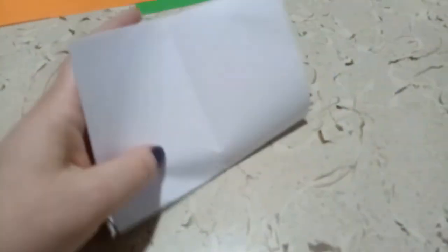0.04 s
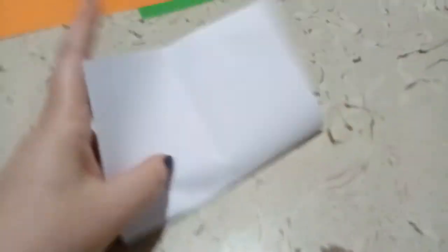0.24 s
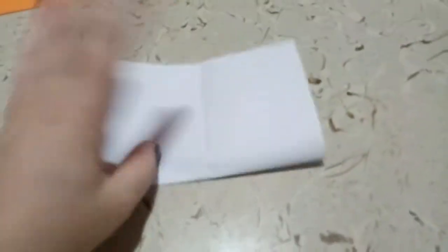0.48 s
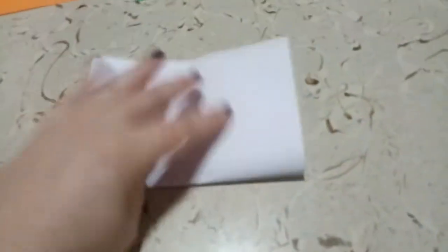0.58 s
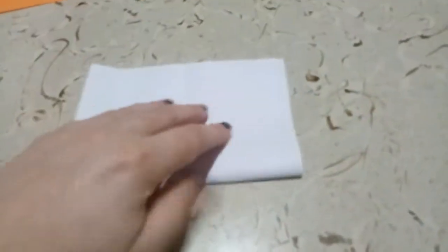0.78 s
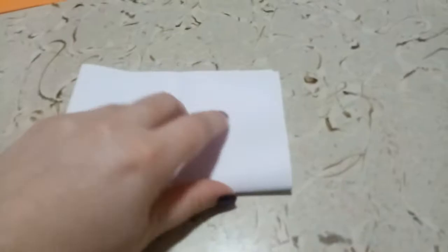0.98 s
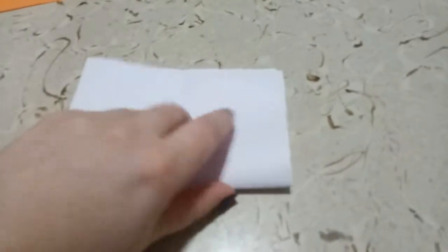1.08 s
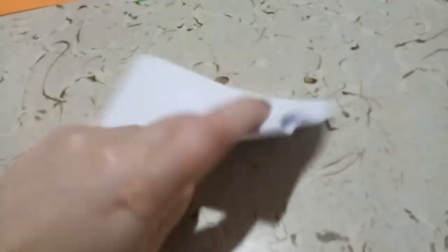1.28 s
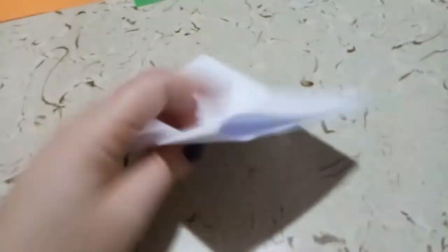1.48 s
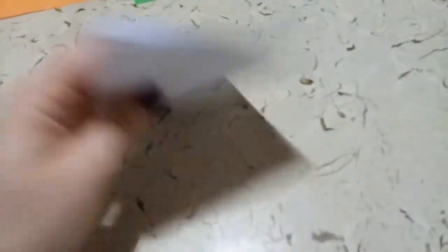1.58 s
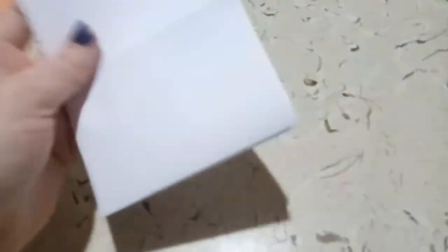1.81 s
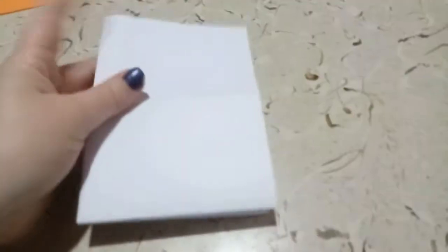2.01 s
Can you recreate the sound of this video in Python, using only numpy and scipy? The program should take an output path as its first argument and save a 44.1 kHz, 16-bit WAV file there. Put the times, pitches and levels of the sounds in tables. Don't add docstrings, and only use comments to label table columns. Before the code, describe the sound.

Layered paper folded by hand on a table: dry snaps and crinkles, one sharp early crack, a second strong crease, then softer handling and sliding rustles, close to a small microphone in a quiet, faintly humming room.

```python
import sys
import numpy as np
from scipy import signal
from scipy.fft import rfft, irfft
from scipy.io import wavfile
from scipy.ndimage import uniform_filter1d

SR = 44100
rng = np.random.default_rng(int(sys.argv[2]) if len(sys.argv) > 2 else 0)


def waveform_to_disk(signal):
    frames = np.transpose(np.atleast_2d(signal))
    scaled = np.clip(frames, -1, 1) * 32767
    samples = np.round(scaled).astype(np.int16)
    wavfile.write(sys.argv[1], SR, samples)


def voltage_ratio(level):
    return 10 ** (np.asarray(level, float) / 20)


N = 90404

# start in seconds, peak in dB, panel pitch in Hz, bright tick in dB re peak.
SNAPS = [(.0518, -30, 1300, -14), (.2195, -33, 1800, -8), (.2315, -29, 700, -8), (.2356, -22, 5000, 12),
         (.2533, -24, 900, 7), (.2613, -27, 1100, -14), (.2685, -31, 850, -14), (.336, -32, 1300, -14),
         (.3735, -27, 1500, -10), (.3825, -26, 1800, -9), (.389, -27, 1400, -10), (.4087, -19, 1500, 0),
         (.4133, -19, 1700, -14), (.424, -27, 1400, -12), (.506, -29, 2300, -10), (.5365, -34, 2600, -9),
         (.6735, -38, 2000, -6), (.698, -40, 1800, 2), (.7725, -36, 800, -6), (1.0445, -35, 2700, -5),
         (1.2368, -24, 3100, -18), (1.2557, -21, 2100, -30), (1.4197, -30, 1400, -12),
         (1.5795, -28, 2600, -7), (1.586, -33, 1200, -8), (1.708, -32, 1400, -8), (1.7217, -33, 1200, -12),
         (1.76, -32, 1100, -2), (1.7762, -26, 800, -12), (1.889, -40, 900, -8), (.2332, -33, 1700, 0),
         (.2443, -35, 3000, -8), (.2533, -21, 3600, -6), (.2588, -34, 1300, -12), (.4025, -28, 2400, -8),
         (.4075, -24, 1500, -12), (.515, -37, 2200, -8), (.586, -39, 2800, -4), (.713, -39, 2000, -8),
         (.7605, -41, 2000, 0), (.7685, -37, 1800, -6), (1.238, -27, 1600, -18), (1.2415, -30, 2300, -14),
         (1.4365, -33, 1300, -10), (1.4445, -34, 1300, -10), (1.7112, -37, 2600, -10),
         (1.718, -39, 3200, 0), (1.7382, -38, 3300, -6), (1.7785, -29, 3600, -10), (1.781, -30, 1200, -12)]
# start in
# seconds, length in seconds, level in dB, centre in Hz, loudest point as a share of the length (0-1).
CRINKLES = [(0.058, 0.1, -47, 2060, 0.27), (0.084, 0.055, -51, 5050, 1),
            (0.2278, 0.0057, -35.5, 5040, 0.63), (0.297, 0.068, -45, 6030, 0.52),
            (0.381, 0.043, -30, 1690, 0.8), (0.426, 0.047, -41.5, 2240, 0),
            (0.457, 0.013, -40.5, 6800, 0.78), (0.503, 0.048, -49.5, 2300, 0),
            (0.5855, 0.044, -47, 3200, 0.36), (.768, 0.013, -37, 1400, 0.34),
            (1.008, 0.019, -42.5, 3070, 0.72), (1.039, 0.018, -42.5, 2630, 0.46),
            (1.2275, .014, -34.5, 3420, 0.34), (1.234, 0.022, -35.5, 2300, 0.22),
            (1.259, 0.021, -41, 2450, 0.18), (1.312, 0.04, -40.5, 4700, 0.61),
            (1.416, 0.035, -42, 1400, 0.4), (1.485, 0.048, -42, 2950, 0.42),
            (1.565, 0.025, -42, 2020, 0.08), (1.71, 0.0079, -41.5, 2260, 0.4),
            (1.727, 0.016, -41, 3730, 0.83), (1.7754, 0.015, -37.5, 2650, 0.04),
            (1.791, 0.075, -45, 4100, 0), (1.985, 0.029, -50.5, 3650, 0.23),
            (.534, .012, -48.5, 2830, 0.54), (.69, 0.091, -51, 3020, 0.47), (.78, 0.03, -48, 3260, 0.24),
            (.396, .01, -35, 3000, 0.34), (.256, 0.019, -37, 900, 0.14), (0.4144, .007, -27, 2020, 0.2),
            (1.4184, .008, -35.5, 1660, .3)]
# start in seconds, peak in dB, pitch in Hz.
PUSHES = [(0.138, -56, 254), (0.2361, -14.5, 698), (0.2357, -24, 337), (0.239, -25.5, 308),
          (0.307, -41.5, 267), (0.4091, -25, 430), (.772, -36.5, 430), (.82, -45.5, 318), (.917, -42, 192),
          (1.43, -37.5, 445), (1.458, -48, 199), (1.49, -44, 230), (1.582, -38, 290), (1.617, -40.5, 350),
          (1.662, -39.5, 220), (1.723, -41.5, 348), (1.778, -35.5, 283), (1.877, -44, 316),
          (.337, -44, 406), (1.786, -40, 296), (0.327, -52.5, 187)]
# time in seconds, level in dB, brightness in dB per octave.
SLIDE = [(0, -56, -2.5), (.15, -53, -1), (.19, -57, -3.5), (.28, -50, -3.5), (.365, -47, -2.5),
         (.45, -41.5, 0), (0.528, -56.5, -2.5), (0.661, -60, -0.5), (.88, -61.5, -0.5), (1.0, -60, 1.5),
         (1.2, -62.5, 3.5), (1.3, -50, 2), (1.405, -48.5, 1), (1.459, -45.5, -1.5), (1.545, -49, -1.5),
         (1.7, -47.5, -2), (1.87, -54.5, -2), (2.05, -58.5, 5.5)]
# frequency in Hz, gain in dB.
SLIDE_TONE = [(150, 4), (400, -2), (800, -1.5), (1600, 4), (3000, 2), (5000, 1), (8000, -6), (16000, -6.5)]
# start in seconds, length in seconds, level in dB, centre in Hz, width in Hz.
NARROW_BURSTS = [(1.225, 0.04, -41, 15200, 650), (1.226, 0.014, -50, 6800, 450), (1.737, .006, -41.5, 9900, 350),
                 (1.729, 0.0055, -51, 11000, 500), (0.41, 0.0078, -39.5, 5500, 530),
                 (0.712, 0.0052, -55.5, 6500, 470), (0.756, 0.023, -57.5, 6900, 500),
                 (1.438, .03, -54.5, 7100, 600), (1.563, 0.012, -51, 7200, 540), (1.73, 0.0065, -62, 8000, 400),
                 (1.754, .008, -52, 6000, 400), (2, 0.0069, -53, 6360, 400), (1.716, 0.0042, -50, 6400, 400),
                 (.2355, .0014, -21, 6100, 780), (.253, 0.0015, -22, 5730, 900), (.4085, 0.0028, -34, 6030, 800),
                 (.464, 0.0055, -43, 6700, 600), (1.2555, 0.0024, -31.5, 3600, 500),
                 (1.2365, 0.0056, -36, 3300, 350)]
# frequency in Hz, density in dB per Hz.
ROOM_TONE = [(18, -66), (30, -2.5), (129, -8), (256, -13), (414, -13.5), (801, -26.5), (1950, -25.5),
             (2450, -17), (7000, -27.5), (9100, -76), (15400, -120)]
# time in seconds, level in dB.
RUMBLE = [(0.0, -57), (0.02, -50.5), (0.19, -50.5), (0.24, -60), (0.63, -65.5), (0.77, -48.5),
          (1.24, -60.5), (1.27, -53.5), (1.7, -53), (1.74, -78.5), (1.8, -52), (2.05, -57.5)]
# frequency in Hz, gain in dB.
MIC_RESPONSE = [(45, -10.5), (100, 1.5), (4300, -1), (5200, -4.5), (6400, 4.5), (7300, 0), (8200, -15.5),
                (11500, -23), (13500, -27.5), (15000, -17.5), (15700, -14), (16100, -90)]


def evened(x):
    return x / np.sqrt(np.mean(x ** 2) + 1e-20)


def read(points, hz):
    f, value = np.transpose(points)
    return np.interp(np.log(hz + 1), np.log(f + 1), value)


def add(mix, start_s, sound):
    part = mix[round(start_s * SR):][:len(sound)]
    part += sound[:len(part)]


def flex(hz, cycles, glide):
    u = np.arange(2000) * hz / SR
    phase = u + glide * (1 - np.exp(-u * 2))
    envelope = np.exp(-u / cycles) * (1 - np.exp(-u * 6))
    wave = np.sin(2 * np.pi * phase) * envelope
    return wave / abs(wave).max()


def snaps():
    tick_decay_s, tick_rise_s = .0007, .00004
    cycles, glide = 1.1, .5
    out, t = np.zeros(N), np.arange(400) / SR
    tick_shape = np.exp(-t / tick_decay_s) * np.minimum(t / tick_rise_s, 1)
    draws = rng.standard_normal((len(SNAPS), 405))
    for (s, db, hz, tick_db), draw in zip(SNAPS, draws):
        noise = draw[:400]
        tick = (noise - uniform_filter1d(noise, size=20)) * tick_shape
        add(out, s, voltage_ratio(db + tick_db) * tick / abs(tick).max())
        add(out, s, -voltage_ratio(db) * flex(hz, cycles, glide))
        followers = ((draw[401], draw[402], -5), (draw[403] + 3, draw[404], -11))
        for lag, bend, drop_db in followers:
            follower_s = s + 0.001042 + 0.00051 * abs(lag)
            follower_hz = hz * 1.24 ** (np.tanh(bend) + .5)
            add(out, follower_s, voltage_ratio(db + drop_db) * flex(follower_hz, cycles, glide))
    return out


def crinkles():
    grains_per_s, grain_spread_db, fuzz_gain, clump_db = 2200, 4.2, 1.4, 2.3
    width_octaves, broad_gain, fade_db, edge_s = .55, .14, -14, 0.00017
    out, hz = np.zeros(N), np.fft.rfftfreq(4096, 1 / SR)
    chance = rng.random((len(CRINKLES), 2, 4096))
    noises = rng.standard_normal((len(CRINKLES), 4096))
    for (s, length_s, db, centre_hz, top), (hit, size), noise in zip(CRINKLES, chance, noises):
        u, top = np.arange(4096) / SR / length_s, np.clip(top, .02, .95)
        grain_gain = voltage_ratio(-grain_spread_db * np.log(size + 0.016))
        grains = (hit < grains_per_s / SR) * np.sign(noise) * grain_gain
        clumping = evened(uniform_filter1d(size - .5, size=90))
        clicks = (grains + fuzz_gain * noise) * voltage_ratio(clump_db * clumping)
        octaves = np.log2(hz / centre_hz + 0.0035)
        colour = np.exp(-.5 * (octaves / width_octaves) ** 2) + broad_gain * hz / (hz + centre_hz)
        edges = np.clip(np.minimum(u, 1 - u) * length_s / edge_s, 0, 1)
        from_peak = np.where(u < top, 1 - u / top, (u - top) / (1 - top))
        shape = edges * voltage_ratio(fade_db * from_peak)
        add(out, s, voltage_ratio(db) * shape * evened(irfft(rfft(clicks) * colour)))
    return out


def pushes():
    out = np.zeros(N)
    for s, db, hz in PUSHES:
        add(out, s, voltage_ratio(db) * flex(hz, 0.95, 0.11))
    return out


def crack():
    start_s, peak_db, t60_s = .2357, -10.5, .014
    top_hz, end_hz, glide_s = 6800, 1480, .00035
    out, t = np.zeros(N), np.arange(1500) / SR
    hz = end_hz + (top_hz - end_hz) * np.exp(-t / glide_s)
    tone = np.sin(2 * np.pi * np.cumsum(hz) / SR)
    add(out, start_s, voltage_ratio(peak_db - 60 * t / t60_s) * tone)
    return out


def nearby(x):
    echo_db, t60_s = -20, .05
    t = np.arange(4000) / SR
    sparse = rng.standard_normal(4000) * (rng.random(4000) < .1)
    tail = sparse * voltage_ratio(-60 * t / t60_s) * (t > .001)
    return x + voltage_ratio(echo_db) * signal.oaconvolve(x, tail / np.linalg.norm(tail))[:N]


def slide():
    patchy_db, flicker_db, gain_db = 2.6, 1.4, 3.0
    s, db, tilt_db = np.transpose(SLIDE)
    noise = rng.standard_normal(N)
    grit_db = 4.76 * np.minimum(rng.exponential(1, N), 3) * (rng.random(N) < .05)
    hz, t, z = signal.stft(noise * voltage_ratio(grit_db), SR, nperseg=256, noverlap=192)
    field = rng.standard_normal((len(t), len(hz))).T
    patches = uniform_filter1d(uniform_filter1d(field, size=7, axis=0), size=14, axis=1)
    flicker = uniform_filter1d(field[:20].sum(0), size=6)
    octaves = np.log2(np.clip(hz[:, None], 300, 7000) / 2500)
    level_db = read(SLIDE_TONE, hz)[:, None] + octaves * np.interp(t, s, tilt_db) + np.interp(t, s, db)
    level_db = level_db + patchy_db * evened(patches) + flicker_db * evened(flicker)
    return voltage_ratio(gain_db) * signal.istft(z * voltage_ratio(level_db), SR, nperseg=256, noverlap=192)[1][:N]


def narrow_bursts():
    out, hz = np.zeros(N), np.fft.rfftfreq(2048, 1 / SR)
    noises = rng.standard_normal((len(NARROW_BURSTS), 2048))
    for (s, length_s, db, centre_hz, width_hz), noise in zip(NARROW_BURSTS, noises):
        u = np.clip(np.arange(2048) / SR / length_s, 0, 1)
        colour = np.exp(-.5 * ((hz - centre_hz) / width_hz) ** 2)
        band = evened(irfft(rfft(noise) * colour))
        add(out, s, voltage_ratio(db) * np.sin(np.pi * u ** .5) * band)
    return out


def room():
    room_db, hiss_db, split_hz = -59, -67.5, 300
    hum_hz, hum_width_hz, hum_db = 120.3, 16, -60
    hz, (s, db) = np.fft.rfftfreq(N, 1 / SR), np.transpose(RUMBLE)
    tone = rfft(rng.standard_normal(N)) * voltage_ratio(read(ROOM_TONE, hz))
    tone = voltage_ratio(room_db) * tone / np.std(irfft(tone, N))
    low = 1 / (1 + (hz / split_hz) ** 4)
    resonance = 1 / (1 + ((hz - hum_hz) / hum_width_hz) ** 2)
    hum = evened(irfft(rfft(rng.standard_normal(N)) * resonance, N))
    swell = voltage_ratio(np.interp(np.arange(N) / SR, s, db) - np.mean(db))
    rumble = swell * (irfft(tone * low, N) + voltage_ratio(hum_db) * hum)
    hiss = voltage_ratio(hiss_db) * np.diff(rng.standard_normal(N + 2), 2)
    return irfft(tone * (1 - low), N) + rumble + hiss


def scene():
    folds = nearby(snaps() + crinkles() + pushes() + crack())
    return (folds + slide() + room() + narrow_bursts())[None]


def causal(points):
    log_gain = np.log(voltage_ratio(read(points, abs(np.fft.fftfreq(4096, 1 / SR)))))
    return np.fft.ifft(np.exp(np.conj(signal.hilbert(log_gain)))).real[:2048]


def low_pass(x):
    return signal.sosfilt(signal.butter(12, 16650, fs=SR, output="sos"), x)


def record(dry):
    mix = signal.oaconvolve(dry, causal(MIC_RESPONSE)[None])[:, :N]
    return low_pass(mix)


dry = scene()
out = record(dry)
waveform_to_disk(out)
```